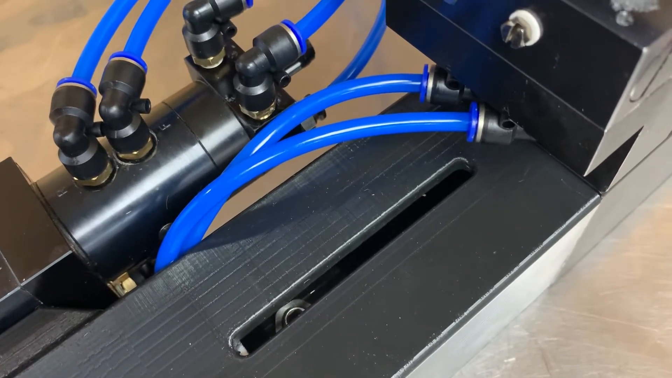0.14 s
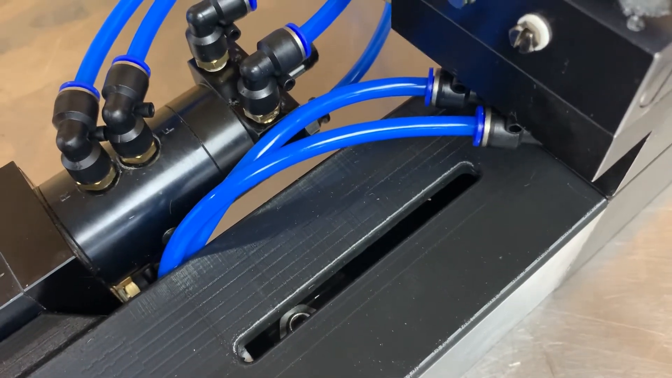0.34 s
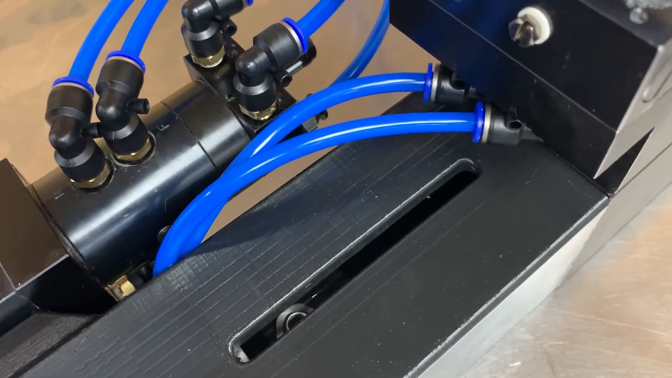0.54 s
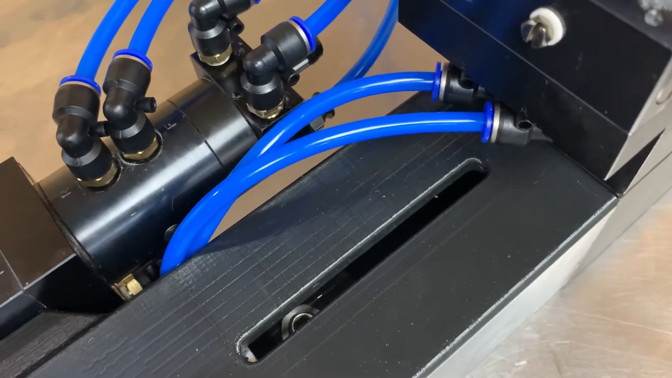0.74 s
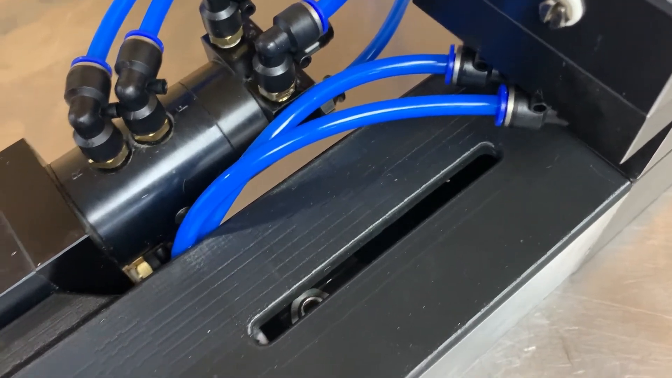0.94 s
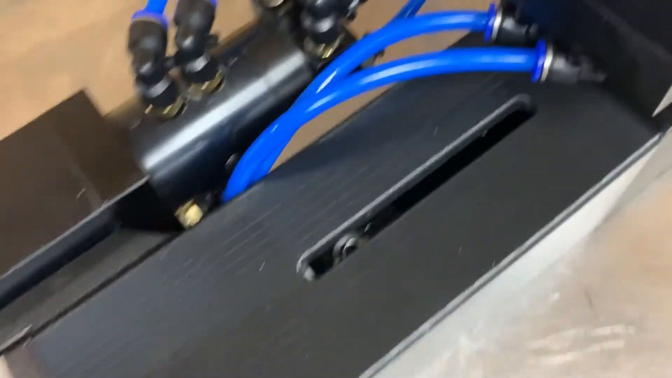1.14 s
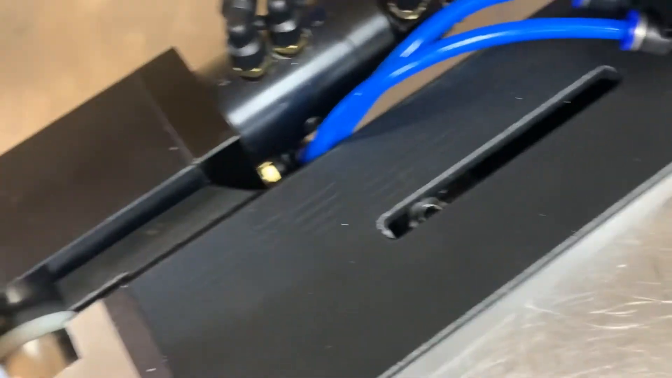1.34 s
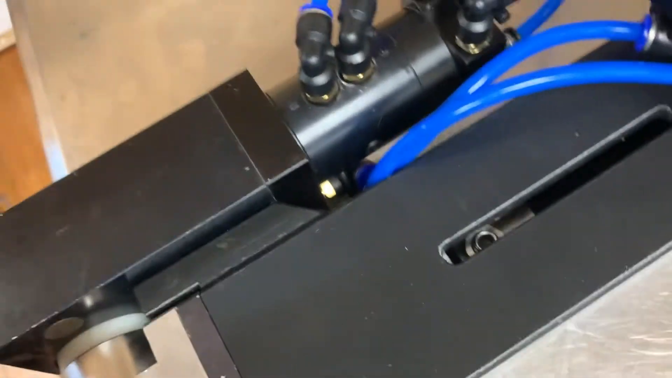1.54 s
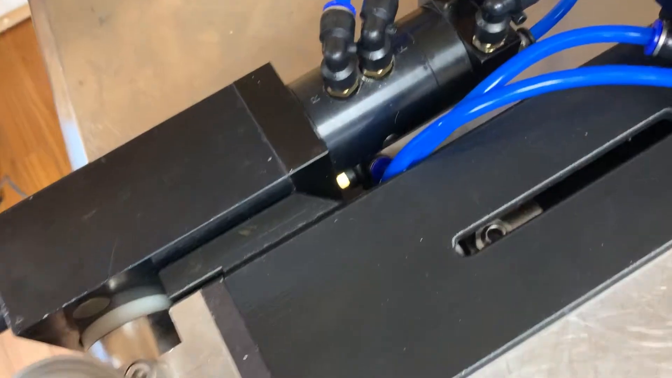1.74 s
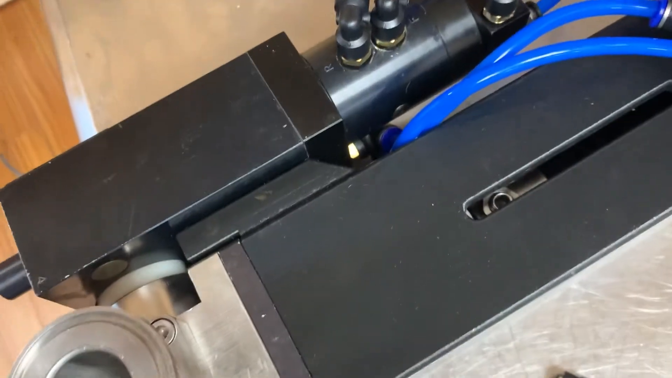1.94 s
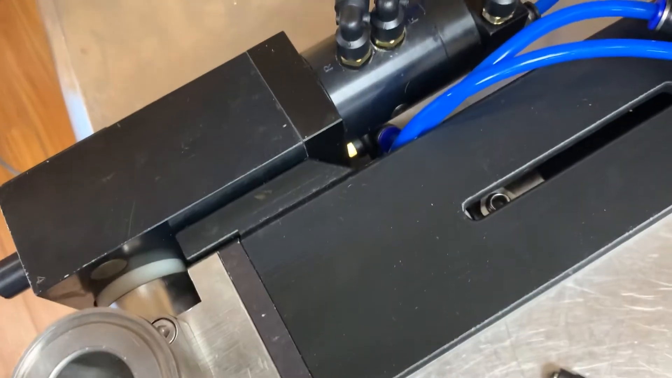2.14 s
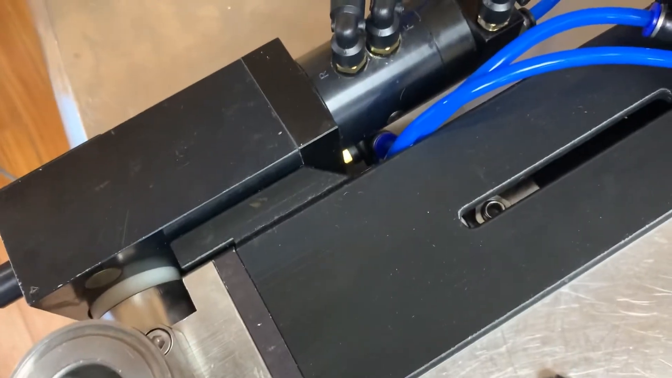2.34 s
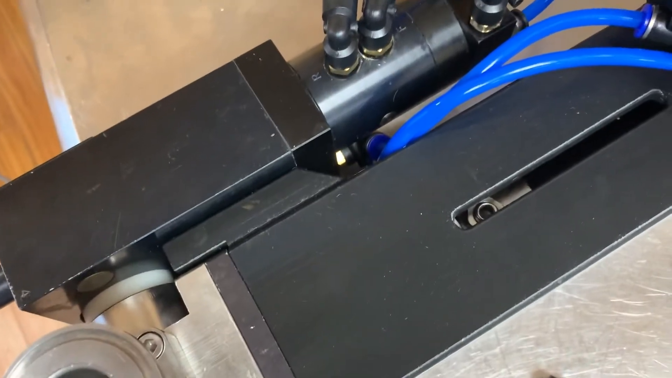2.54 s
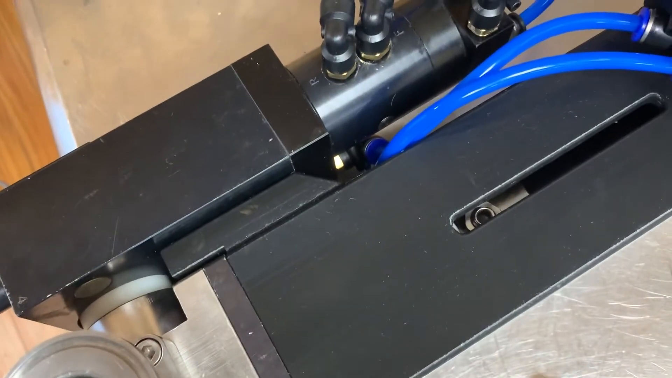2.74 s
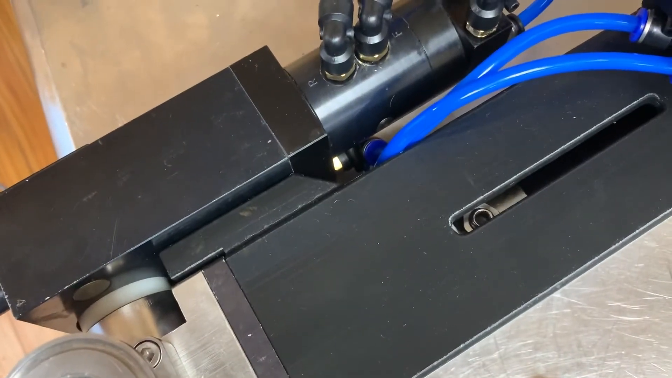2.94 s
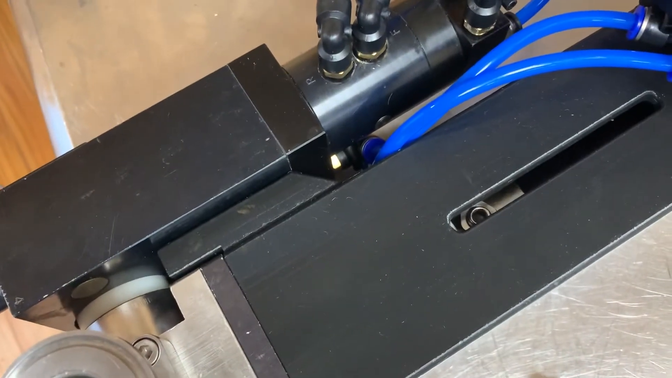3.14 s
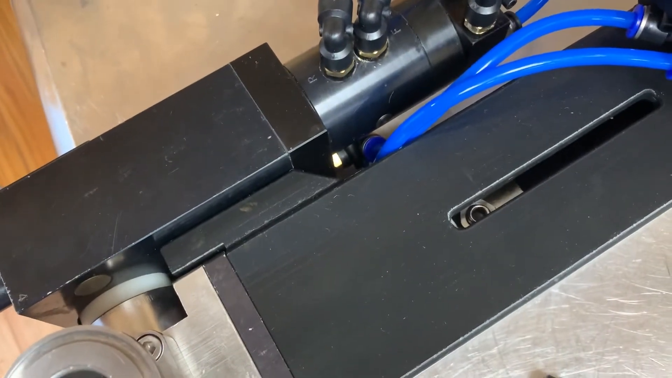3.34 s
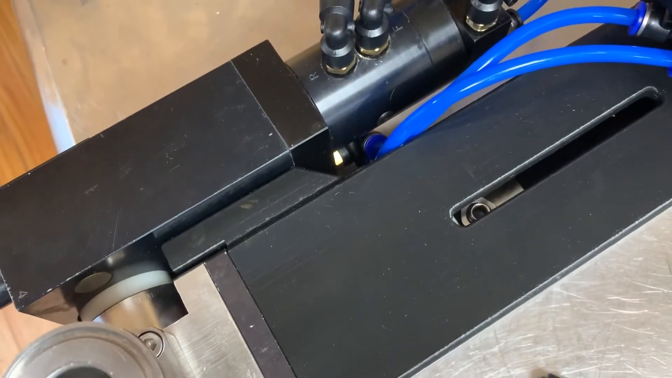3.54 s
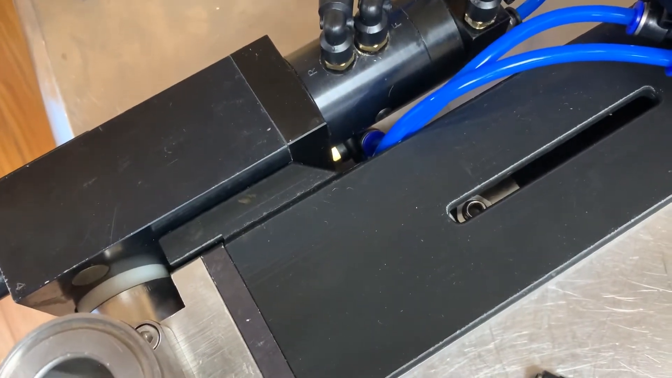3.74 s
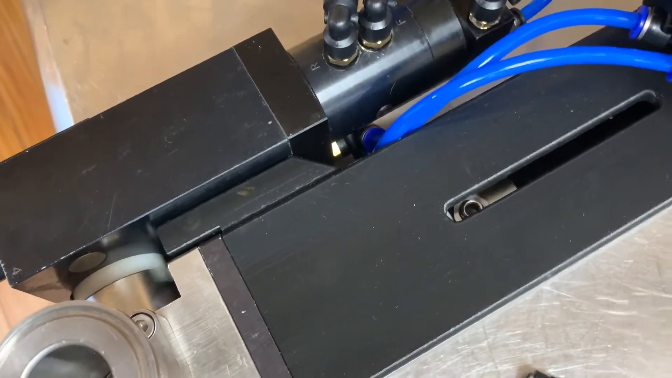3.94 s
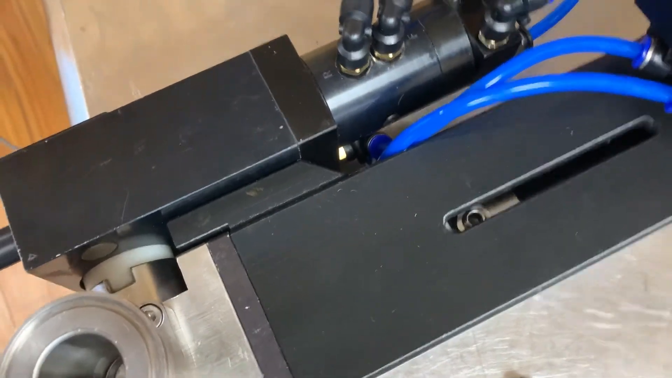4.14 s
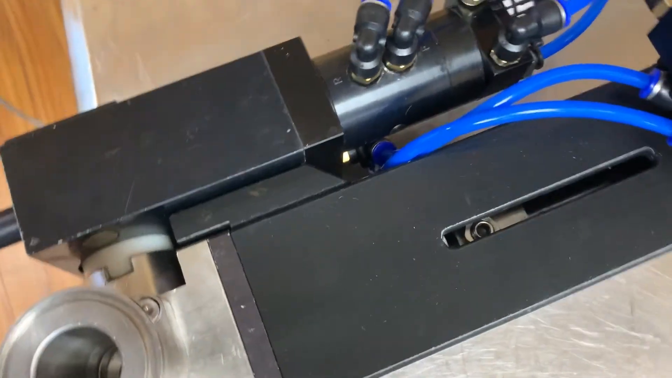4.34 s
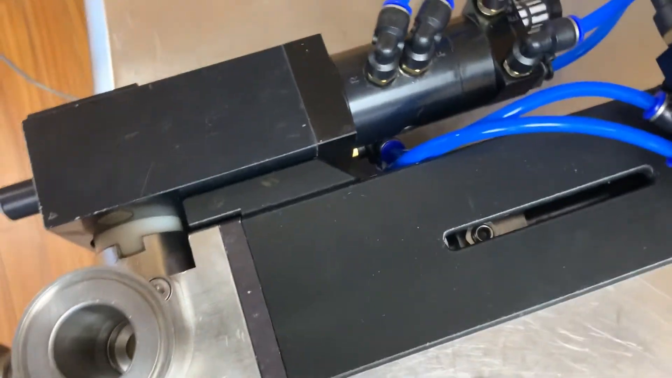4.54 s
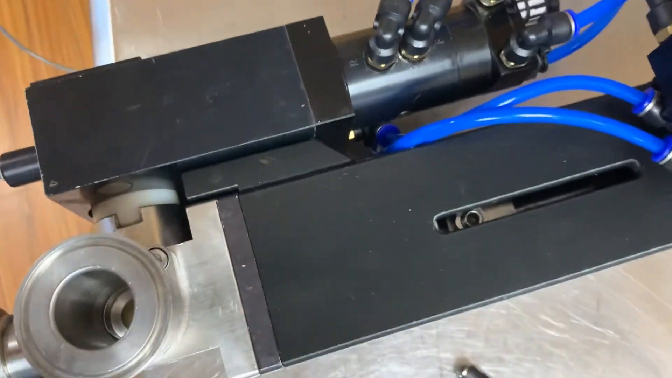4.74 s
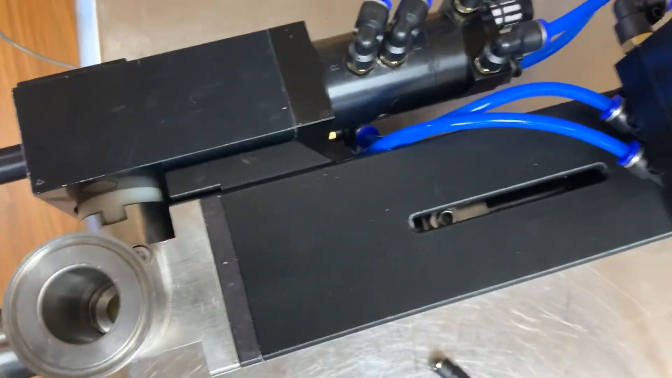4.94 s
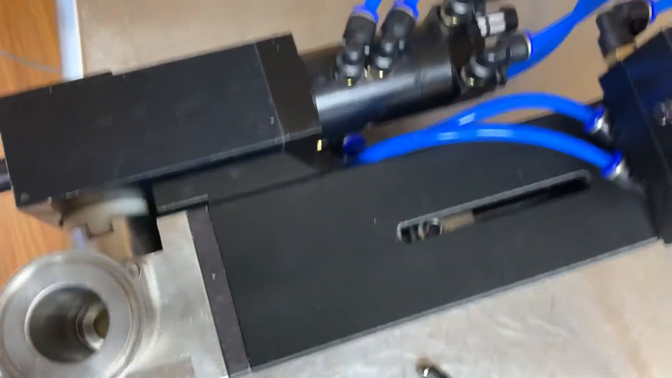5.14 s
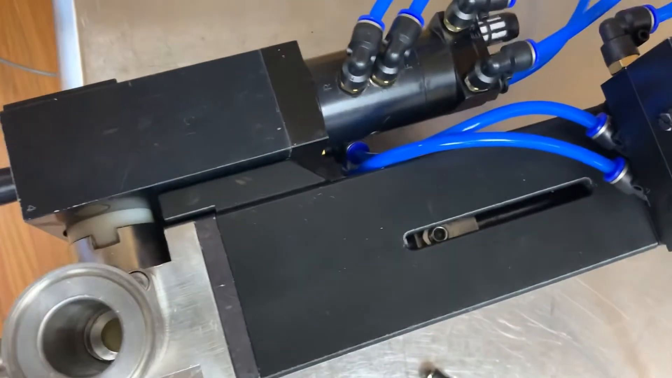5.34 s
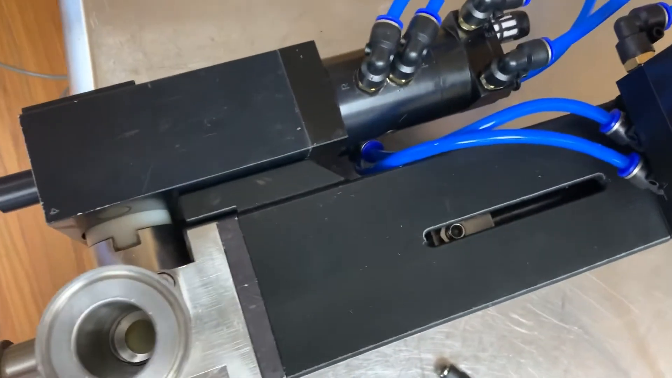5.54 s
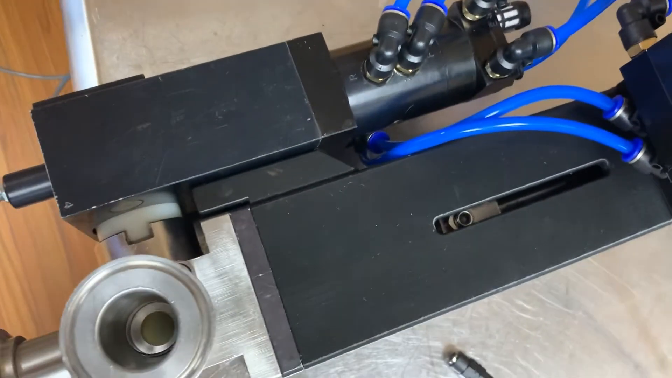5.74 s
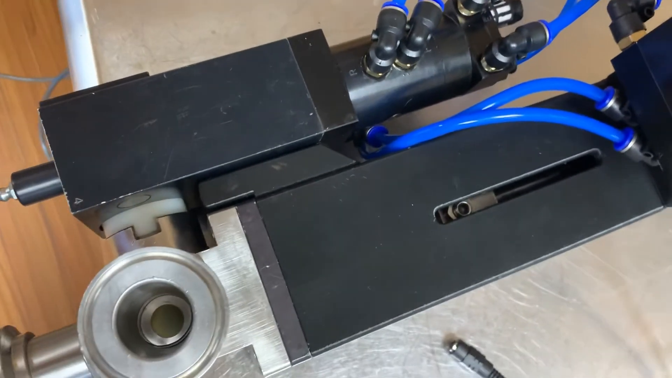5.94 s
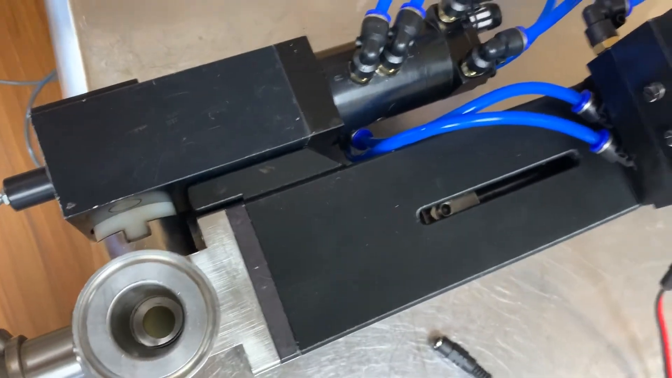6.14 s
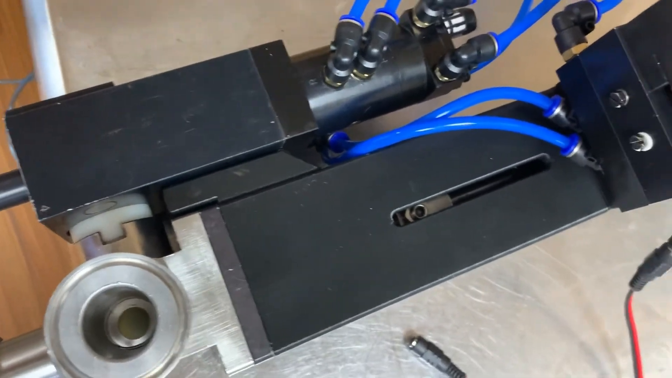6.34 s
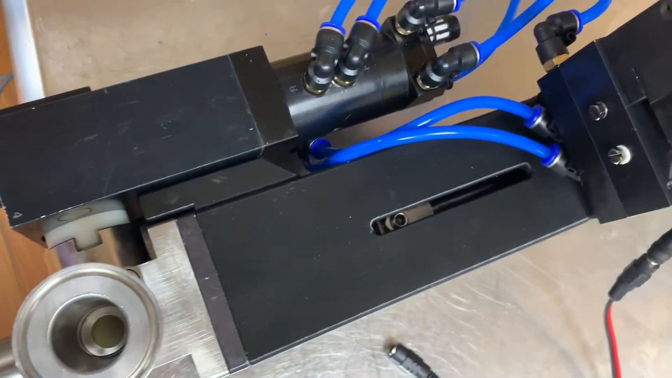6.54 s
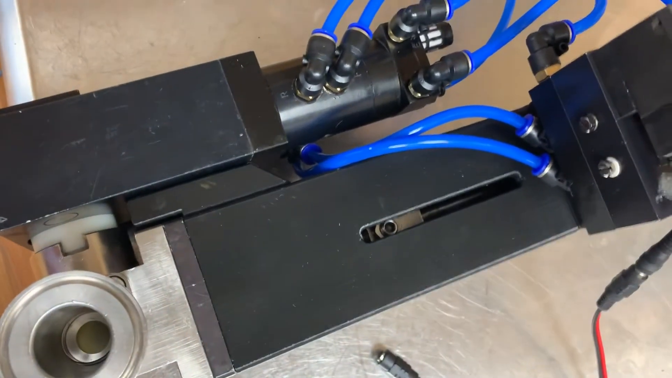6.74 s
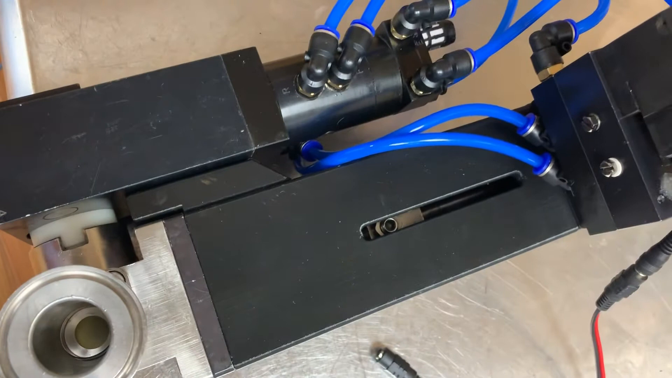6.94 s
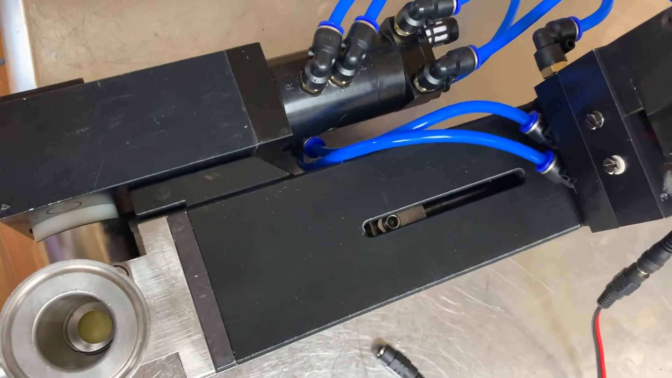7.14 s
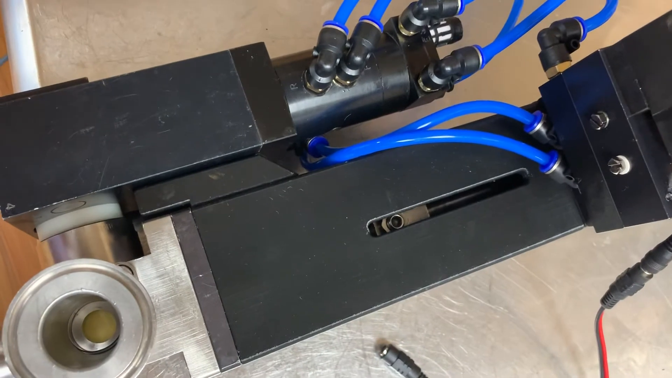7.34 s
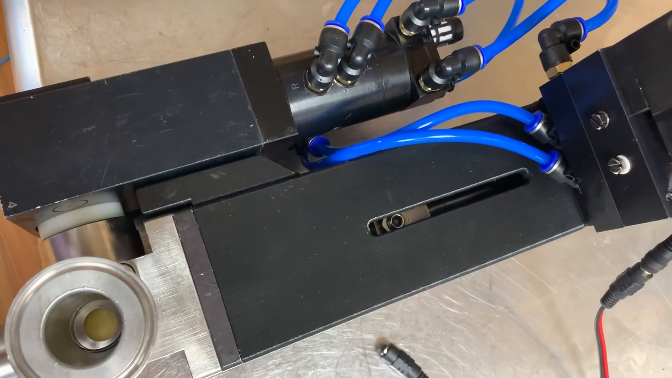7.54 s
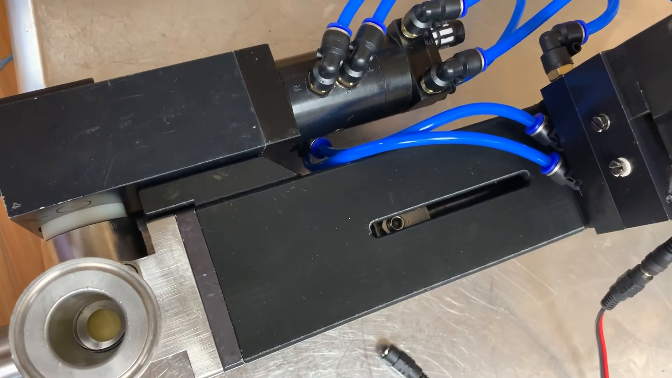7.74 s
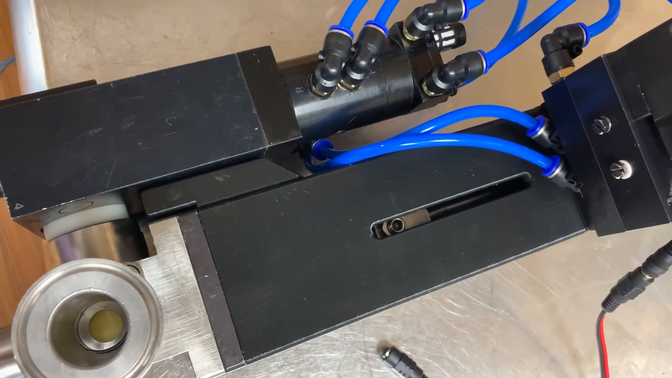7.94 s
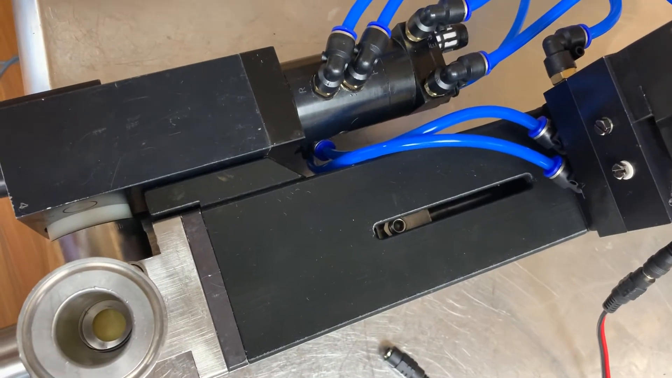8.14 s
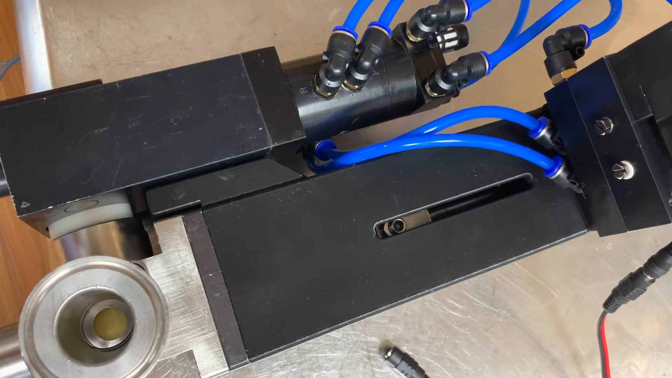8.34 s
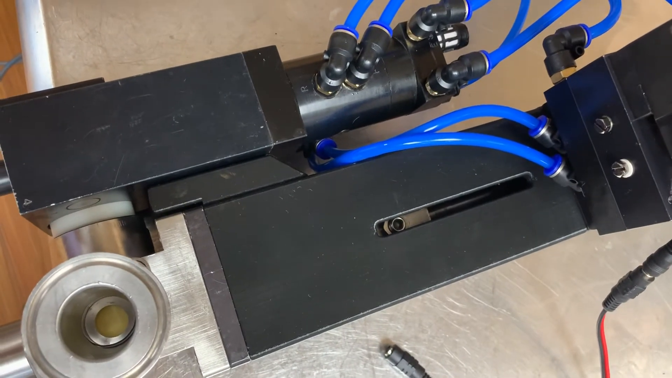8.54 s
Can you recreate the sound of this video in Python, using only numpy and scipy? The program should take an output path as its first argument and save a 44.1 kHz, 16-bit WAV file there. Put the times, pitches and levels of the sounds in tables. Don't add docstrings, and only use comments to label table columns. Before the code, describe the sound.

Close stereo view of a pneumatic cylinder in a humming factory hall. Air drains softly, then a double metallic clack with a burst of air starts a bright, steady hiss that dulls and shifts as the microphone draws back. Near four seconds another clack switches to a quieter, hollow hose breath, followed by a hard ringing knock. The airflow fades until a third clack at seven seconds brings back a softer hiss.

```python
import sys
import numpy as np
from scipy import signal
from scipy.fft import rfft, irfft
from scipy.io import wavfile
from scipy.ndimage import uniform_filter1d

SR = 44100
rng = np.random.default_rng(int(sys.argv[2]) if len(sys.argv) > 2 else 0)


def ratio_of_db(decibels):
    return 10 ** (np.asarray(decibels, float) / 20)


def bounce(signal):
    frames = np.transpose(np.atleast_2d(signal))
    limited = np.clip(frames, -1, 1)
    pcm = np.round(limited * 32767).astype(np.int16)
    wavfile.write(sys.argv[1], SR, pcm)


N = 383669
HZ = np.fft.rfftfreq(N, 1 / SR) + 1e-3
TOP_HZ = 15750

# (starts [s], ends [s])
MOVE_S = (.98, 1.65)
# (frequency [Hz], level [dB per Hz])
JET_COLOURS = [
    [(880, -46), (1500, -14.5), (1690, -29), (1990, -20.5), (2420, -15.5), (2890, -22), (3770, -14),
     (4240, -3.5), (4810, -12), (5700, -8.5), (6300, -7), (6800, -9), (7400, -6.5), (8300, -0.5),
     (9300, 0.5), (9900, -5), (10700, -3), (11150, -1), (11550, 4), (12800, 0), (13600, -8), (14600, -2.5),
     (15450, 0), (16500, -10.5)],
    [(880, -79), (1500, -18), (1970, -20.5), (2290, -14.5), (2920, -18.5), (3730, -6), (4860, -16),
     (5860, -5), (6850, -7), (7340, -3), (9280, -3), (10000, 2), (10950, -4.5), (11400, 2.5), (11800, -5),
     (12700, 2), (13400, -4.5), (13900, -1), (14700, -11), (15300, -6), (15600, -6)],
    [(880, -58), (1500, -21.5), (2400, -17), (2900, -13.5), (3380, -13), (3880, -16.5), (4450, -6.5),
     (5260, -14), (6650, -5.5), (7340, -4.5), (8010, 1), (8840, -6), (11000, -0.5), (12100, -3.5),
     (14400, -4.5), (15600, -7)],
]
# (frequency [Hz], left minus right [dB])
PORT_BALANCE = [(70, -.2), (150, 1.2), (1000, 1.3), (2000, 2.5), (2750, -.5), (3800, 3), (5200, 4),
                (6500, .5), (7600, -1.5), (8500, .3), (10500, 0)]
# (frequency [Hz], likeness [0-1])
NEAR_LIKENESS = [(60, .995), (300, .985), (700, .9), (1500, .6), (4500, .5), (7000, .55), (8000, .8),
                 (9800, .8), (11300, .96)]
# (frequency [Hz], likeness [0-1])
FAR_LIKENESS = [(90, .975), (300, .87), (700, .6), (1200, .65), (1900, .3), (3300, .62), (4700, .35),
                (6000, .6), (8000, .78), (9800, .78), (11300, .98)]
# (frequency [Hz], left leads by [rad])
VALVE_PHASE = [(0, 0), (700, -.6), (1250, -1.2), (1600, -3.1), (2400, -6.3), (3100, -9.4), (4300, -12.5),
               (5400, -15.2), (6300, -18.8), (7100, -20.4), (9000, -19.9), (10200, -19.4),
               (11300, -6 * np.pi)]


def at_hz(points):
    hz, value = np.transpose(points)
    return np.interp(np.log(HZ), np.log(np.maximum(hz, 1)), value)


def in_time(rows):
    s, *columns = np.transpose(rows)
    t = np.arange(N) / SR
    return [ratio_of_db(np.interp(t, s, column, -200, -200)) for column in columns]


def drift(rate_hz):
    points = rng.standard_normal(int(N / SR * 60))
    slow = signal.filtfilt(*signal.butter(1, min(rate_hz, 25) / 30), points)
    return np.interp(np.linspace(0, len(slow) - 1, N), np.arange(len(slow)), slow / slow.std())


def ports(direct, scattered, likeness, phase_table, balance):
    alike = at_hz(likeness)
    phase = np.interp(HZ, *np.transpose(phase_table))
    sign = np.array([[1], [-1]])
    pair = np.sqrt((1 + alike) / 2) * direct + sign * np.sqrt((1 - alike) / 2) * scattered
    return irfft(pair * np.exp(.5j * sign * phase) * ratio_of_db(sign * at_hz(balance) / 2), N)


def air(gain, likeness, phase_table=VALVE_PHASE, top_hz=TOP_HZ, balance=PORT_BALANCE):
    direct, scattered = gain * (HZ < top_hz) * rfft(rng.standard_normal((2, N)))
    x = ports(direct, scattered, likeness, phase_table, balance)
    return x / np.sqrt(np.mean(x.mean(axis=0) ** 2))


def echoed(colour, stretch):
    # (delay [s], level [dB])
    bench_echoes = [(.00047, -32), (.00057, -16.5), (.0019, -17), (.0032, -21), (.0047, -20), (.0071, -22)]
    ripple = 1 + sum(ratio_of_db(db) * np.exp(-2j * np.pi * HZ * s * stretch) for s, db in bench_echoes)
    return ratio_of_db(at_hz(colour)) * np.abs(ripple)


def hose(waves):
    power = sum(ratio_of_db(2 * db) / (1 + (2 * (HZ - hz) / width) ** 2) ** 1.25 for hz, width, db in waves)
    return air(np.sqrt(power), NEAR_LIKENESS) * ratio_of_db(.7 * drift(rate_hz=3.0))


def ring(clicks, hz, t60):
    r = ratio_of_db(-60 / (t60 * SR))
    w = 2 * np.pi * hz / SR
    return signal.lfilter([0, np.sin(w)], [1, -2 * r * np.cos(w), r * r], clicks + 1e-18)


def strike(times, strengths_db, modes, chatter_s, late_cycles, soft=False):
    t = np.arange(400) / SR
    chatter = rng.standard_normal((len(times), 400)) ** 3 * np.exp(-t / chatter_s)
    chatter /= np.sqrt(np.sum(chatter ** 2, axis=1, keepdims=True))
    if soft:
        chatter = np.exp(-t / chatter_s) / (chatter_s * SR) + 0 * chatter
    at = (np.array(times) * SR).astype(int)[:, None] + np.arange(400)
    out = np.zeros(N)
    for k, ((hz, level_db, t60), db) in enumerate(zip(modes, strengths_db.T)):
        clicks = np.zeros(N)
        np.add.at(clicks, at + int(late_cycles * SR / hz), chatter * ratio_of_db(db + level_db)[:, None])
        out += (-1) ** k * ring(clicks, hz, t60)
    return out


def hall():
    # (frequency [Hz], level [dB per Hz])
    colour = [(12, -46), (20, -41), (38, -7), (54, -14), (87, 1), (135, -9), (153, -12), (232, -11),
              (312, -23.5), (436, -24), (464, -28), (801, -27.5), (1970, -29.5), (2280, -38), (3000, -44),
              (3900, -61), (6600, -120)]
    # (frequency [Hz], left-right likeness [0-1])
    likeness = [(30, .96), (90, .95), (250, .72), (500, .4), (900, .3), (1900, .3), (3300, .5)]
    # (frequency [Hz], left minus right [dB])
    balance = [(70, 0), (130, .8), (250, 3.8), (450, -1.5), (1000, -.5), (2000, 1.5)]
    near = 1 - np.interp(np.arange(N) / SR, MOVE_S, (0, 1))
    level = ratio_of_db(-49.5 + 2 * near + 1.2 * drift(rate_hz=6.2))
    return level * air(ratio_of_db(at_hz(colour)), likeness, balance=balance)


def frame():
    # (time [s], level [dB])
    frame_thuds = [
        (0.565, -45),
        (4.348, -32),
        (7.547, -48),
    ]
    t = np.arange(N) / SR
    dying = sum(ratio_of_db(db - 60 * np.maximum(t - s, 0) / 0.21) * np.clip((t - s) / 0.0018, 0, 1)
                for s, db in frame_thuds)
    return dying * air(1 / (1 + (400 / HZ) ** 4 + (HZ / 1400) ** 4), NEAR_LIKENESS)


def return_stroke():
    # (starts [s], ends [s], level [dB])
    returns = [
        (-1.57, .176, -41),
        (4.0, 7.03, -47),
    ]
    # (frequency [Hz], width [Hz], level [dB])
    wide_hose = [(222, 21.5, -0.5), (395, 113, -7.5), (517, 33, -2.5), (630, 41, -1.5), (764, 112, -2),
                 (904, 42, -3.5), (985, 22, 0.5), (1054, 51, -2)]
    narrow_hose = [(1552, 33, 2.5), (1695, 90, 5), (1974, 48, 3), (2124, 41, 0.5), (2400, 110, -1.5),
                   (2630, 92, -3.5), (2844, 64, -3.5), (3125, 114, 2.5), (3520, 310, -2), (3850, 125, 4),
                   (4050, 31, -9), (4085, 59, 4.5), (4380, 32, 2.5), (4660, 63, -6), (6500, 93, -10),
                   (6840, 90, -1.5), (7100, 64, -10), (7400, 150, -15)]
    # (frequency [Hz], width [Hz], level [dB])
    fitting = [(1250, 90, 2), (1490, 120, 2), (1960, 60, 0), (2700, 150, -3), (6410, 160, 0),
               (6610, 80, -5)]
    # (frequency [Hz], level [dB per Hz])
    leak_colour = [(2650, -29), (4500, -1), (4790, -5), (5400, 3.5), (6080, -2), (6610, -5), (7970, 4),
                   (9620, 1), (10600, 4), (12800, -14), (13900, -15), (14900, -2), (15600, -7)]
    far_hiss = [(1470, -42), (2500, -25), (3050, -3), (3610, -1), (3930, -18), (4240, -10), (5670, -3),
                (6030, -7), (9200, -2), (9930, -1.5), (10800, -6), (14100, -3.5), (15600, -3)]
    layer_db = [0, -3.5, -1.5, -1.64]
    follows = [0.98, 1.11, 1.56, 0.74]
    layer_fill_db = [0, 0, -4, -0.5]
    fill_s, steady_s, drain_db, drain_s = 0.4, 0.46, -18, 1.85

    t = np.arange(N) / SR
    wide, lower, upper = hose(wide_hose), hose(narrow_hose[:8]), hose(narrow_hose[8:])
    leak = air(echoed(leak_colour, 1.4), FAR_LIKENESS)
    drag_s, drag_hold_s, drag_edge_s = 4.83, 0.12, 0.058
    off = np.maximum(drag_s - t, t - drag_s - drag_hold_s).clip(0) / drag_edge_s
    out = ratio_of_db(-50 - 22 * off) * hose([(330, 120, -3), (523, 220, 1)])
    out = out + ratio_of_db(-53) * air(echoed(far_hiss, 1.3), FAR_LIKENESS)
    for starts, ends, db in returns:
        age = t - starts
        on = (t >= starts) * (t < ends)
        filling = np.clip(1 - age / fill_s, 0, 1)
        flow_db = drain_db * (1 - np.exp(-np.maximum(age - steady_s, 0) / drain_s))
        wide_gain, lower_gain, upper_gain, leak_gain = (
            on * ratio_of_db(db + own_db + fill_db * filling + share * flow_db)
            for own_db, share, fill_db in zip(layer_db, follows, layer_fill_db))
        shade = ratio_of_db(-2 * (starts < 0))
        spit = on * ratio_of_db(db + 15 - 295 * np.abs(age))
        out = out + wide_gain * wide + lower_gain * lower + upper_gain * upper * shade
        out = out + (leak_gain + spit) * leak
    return out + (t < returns[0][1]) * ratio_of_db(-54) * hose(fitting)


def sliding_colour(s, hz):
    # (near [Hz], aside [Hz], arrives [s])
    landmarks = [(2900, 2960, 1.4), (4240, 3700, 1.7), (6300, 5400, 1.35), (7700, 4600, 1.3),
                 (8900, 7900, 1.5), (9900, 8600, 1.55), (11550, 10000, 1.2), (13600, 10950, 1.73),
                 (15100, 12500, 2.1), (17500, 14700, 2.0), (19000, 18000, 2.0)]
    levels_db = []
    for k in (0, 1):
        gain = echoed(JET_COLOURS[k], 1 + .17 * k)
        levels_db.append(20 * np.log10(gain / np.sqrt(np.mean(gain[HZ < TOP_HZ] ** 2)) + 1e-9))
    near_db, aside_db = levels_db
    near_hz, aside_hz, arrives = np.transpose(landmarks)
    out = np.zeros((len(hz), len(s)))
    for k, now in enumerate(s):
        moved = np.clip((now - MOVE_S[0]) / (arrives - MOVE_S[0]), 0, 1) ** 0.71
        place = np.r_[0, near_hz + moved * (aside_hz - near_hz)]
        share = np.interp(hz, place[1:], moved) ** 1.1
        from_near = np.interp(np.interp(hz, place, np.r_[0, near_hz]), HZ, near_db)
        from_aside = np.interp(np.interp(hz, place, np.r_[0, aside_hz]), HZ, aside_db)
        out[:, k] = ratio_of_db((1 - share) * from_near + share * from_aside)
    return out


def jet():
    # (vent opens [s], full flow [s], ends [s], first level [dB], full level [dB])
    forwards = [
        (.3, 0.478, 3.9, -50.5, -35.5),
        (7.195, 7.694, 8.7, -47.5, -42),
    ]
    # (frequency [Hz], left leads by [rad])
    vent_phases = [
        [(0, 0), (700, -.7), (1500, -3.1), (2400, -6.3), (3000, -9.4), (3450, -6.3), (4500, -6.8), (5000, -8.2),
         (6500, -9.5), (7000, -9.2), (8000, -7.8), (10200, -6.9), (11300, -2 * np.pi)],
        [(0, 0), (700, -.7), (1500, -3.1), (2400, -6.3), (3000, -9.4), (3900, -7.5), (4600, -7), (4900, -4.3),
         (6000, -6.3), (7000, -8.4), (9000, -7.3), (10200, -6.9), (11300, -2 * np.pi)],
        [(0, 0), (700, -.7), (1500, -3.1), (2300, -5.5), (2750, -9.2), (3600, -6.3), (4300, -4.5), (4800, -3.2),
         (5400, -3.4), (6200, -6.3), (7300, -8.2), (9000, -7.3), (11300, -2 * np.pi)],
    ]
    t = np.arange(N) / SR
    level, later = (in_time([(opens, first_db), (full, db), (ends, db)])[0]
                    for opens, full, ends, first_db, db in forwards)
    level = level * ratio_of_db(-4 * (1 - np.exp(-np.maximum(t - MOVE_S[0], 0) / 0.42)))
    near, aside = (air(1, FAR_LIKENESS, vent_phases[k]) for k in (0, 1))
    above = air(echoed(JET_COLOURS[2], 1.34), FAR_LIKENESS, vent_phases[2])
    turn = np.interp(t, MOVE_S, (0, np.pi / 2))
    moving = np.cos(turn) * near + np.sin(turn) * aside
    span = 4 * SR
    hz, s, frames = signal.stft(moving[:, :span], SR, nperseg=1024)
    first = np.zeros((2, N))
    first[:, :span] = signal.istft(frames * sliding_colour(s, hz), SR, nperseg=1024)[1][:, :span]
    return ratio_of_db(0.54 * drift(rate_hz=4.8)) * (level * first + later * above)


def valve_flow(opens, full, seats, rush_db, puff_db):
    rush_sag, rumble_sag = 60, 114
    rush_bleed, rumble_bleed, bleed_s = 430, 215, 0.21
    swell = max(seats - .01, full + 0.0008)
    shut = seats + 0.009
    low_db = rush_db - 6
    end_db = rush_db - rush_sag * (seats - full)
    shut_db, puff_shut_db = end_db - 12.5, puff_db - 15
    return [(opens - 0.017, rush_db - 30, low_db - 30),
            (opens, rush_db - 10.5, low_db - 10.5),
            (full, rush_db, low_db),
            (swell, rush_db - rush_sag * (swell - full), low_db - rumble_sag * (swell - full)),
            (seats, end_db, puff_db),
            (shut, shut_db, puff_shut_db),
            (shut + bleed_s, shut_db - rush_bleed * bleed_s, puff_shut_db - rumble_bleed * bleed_s)]


def rushes():
    # (spool opens [s], fully open [s], seats [s], rush [dB], seating puff [dB])
    reversals = [
        (0.181, 0.191, 0.28, -22, -22),
        (3.907, 3.915, 3.98, -19, -19),
        (7.031, 7.036, 7.115, -20, -20),
        (7.136, 7.14, 7.155, -29.5, -30),
    ]
    rush_spots = [0, 1, 2, 2]
    # (frequency [Hz], level [dB per Hz])
    rush_colours = [
        [(760, -28), (1300, -18), (1530, -5), (1630, -15), (1970, -4.5), (2300, -13), (2770, -4), (3740, -9.5),
         (4280, -14), (4950, -15), (6980, -8.5), (7580, -10), (10600, -14.5), (15500, -21)],
        [(760, -57), (1300, -35), (1630, 1.5), (1810, -8), (1890, -6), (2250, -6.5), (2520, -17), (2600, -1.5),
         (3340, -1), (3670, -4.5), (6420, -12), (7820, -1.5), (8670, -9.5), (15500, -16.5)],
        [(760, -14), (1300, -4.5), (1370, -19), (1680, -9), (1860, 0), (1990, 1), (2350, -5.5), (3110, 1),
         (3590, -4.5), (3900, -8.5), (6160, -6), (8580, -1), (9330, -7.5), (15500, -18)],
    ]
    # (frequency [Hz], level [dB per Hz])
    rumble_colour = [(35, -30), (60, -1), (107, 0), (165, -5.5), (234, -5), (350, -7.5), (532, -5.5),
                     (775, -6.5), (1370, -9), (1500, -14), (1950, -58.5), (3300, -120)]
    rumble = air(ratio_of_db(at_hz(rumble_colour)), NEAR_LIKENESS)
    flutter = ratio_of_db(0.9 * uniform_filter1d(rng.standard_normal(N), size=60) * np.sqrt(60))
    rush = [flutter * air(ratio_of_db(at_hz(colour)), NEAR_LIKENESS) for colour in rush_colours]
    out = 0
    for row, spot in zip(reversals, rush_spots):
        rush_gain, rumble_gain = in_time(valve_flow(*row))
        out = out + rush_gain * rush[spot] + rumble_gain * rumble
    return out


def knocks():
    # (time [s], peak [dB], low modes [dB], high modes [dB])
    blows = [
        (0.5632, -39.5, 7, 11),
        (0.572, -47, 11, 8),
        (4.3466, -12, -16, 1),
        (4.352, -21, 9.5, -15),
        (4.3622, -30, 9.5, -2),
        (7.5456, -39.5, -8, 9.5),
        (7.5556, -41.5, -1, 8),
        (7.565, -48, 11, -4),
        (7.585, -59, 24, -4),
        (7.601, -59, 26, -4),
    ]
    # (frequency [Hz], level [dB], t60 [s])
    cylinder_modes = [(206, -17.5, 0.037), (411, -19.5, 0.039), (503, -20.5, 0.082), (636, -24, 0.031),
                      (807, -16.5, 0.1), (960, -5.5, 0.0084), (1095, 0, 0.035), (1246, -10, 0.034),
                      (1470, -8, 0.018), (1720, -13, 0.031), (2120, -9, 0.014), (2420, -12.5, 0.02),
                      (2580, -10, 0.016), (2980, -17, 0.01)]
    housing_modes = [(1210, 2.5, 0.11), (1236, -2, .12)]
    # (time [s], level [dB])
    seat_ring = [
        (0.268, -26),
        (0.305, -35.5),
        (3.984, -28),
        (7.035, -31),
        (7.1115, -22.5),
        (7.135, -32),
        (7.55, -43.5),
    ]
    s, peak_db, low_db, high_db = np.transpose(blows)
    hz = np.array(cylinder_modes)[:, 0]
    tilt_db = np.outer(low_db, hz < 700) + np.outer(high_db, hz > 1600)
    strengths_db = peak_db[:, None] + tilt_db + rng.normal(0, 1.8, tilt_db.shape)
    cylinder = strike(s, strengths_db, cylinder_modes, chatter_s=.00006, late_cycles=1.365, soft=True)
    s, seat_db = np.transpose(seat_ring)
    return cylinder + strike(s, seat_db[:, None], housing_modes, chatter_s=.00006, late_cycles=0.92, soft=True)


def thumps():
    # (time [s], peak [dB], start [Hz], end [Hz], dies in [s])
    bounces = [(.177, -20, 800, 690, .006), (.1831, -22, 700, 500, .006), (.1924, -11, 450, 165, .013),
               (.2637, -11.5, 850, 270, .013), (.271, -19, 500, 200, .015), (.2815, -23, 80, 72, .045),
               (3.9107, -17, 900, 700, .005), (3.9116, -15, 600, 190, .016),
               (3.977, -6.5, 1050, 230, .0105), (3.9835, -15, 300, 160, .013), (3.992, -23, 80, 72, .045),
               (4.398, -34, 700, 240, .03), (7.0319, -18, 900, 550, .006), (7.0341, -12, 560, 190, .014),
               (7.042, -27, 200, 145, .05), (7.1059, -10.5, 980, 230, .011), (7.1135, -18, 300, 130, .016),
               (7.12, -23, 82, 75, .045), (7.1444, -20, 500, 240, .011), (7.607, -42, 250, 130, .04)]
    out = np.zeros(N)
    t = np.arange(5000) / SR
    for s, db, start_hz, end_hz, dies in bounces:
        hz = end_hz + (start_hz - end_hz) * np.exp(-t / .0015)
        swell = (1 - np.exp(-t / .0004)) * ratio_of_db(db - 8 * t / dies - 60 * (t / dies) ** 3)
        out[int(s * SR):][:5000] -= swell * np.sin(2 * np.pi * np.cumsum(hz) / SR)
    return signal.sosfilt(signal.butter(2, 30, "high", fs=SR, output="sos"), out)


def clacks():
    # (time [s], low metal [dB], high metal [dB], crack [dB], crack centre [Hz])
    contacts = [(0.1753, -28, -38, -21.5, 13000), (0.1845, -13, -14.5, -11, 5000),
                (.187, -28, -30, -16, 2400), (0.1894, -10.5, -13.5, -15, 7950),
                (0.1943, -14, -26, -10, 3500), (0.269, -29, -33, -18.5, 10000),
                (0.2704, -21.5, -32, -14, 9100), (0.28, -23, -36, -10.5, 4240),
                (3.9088, -9, -11.5, -10, 6040), (3.9123, -22, -15, -20, 8500),
                (3.9162, -19, -20, -22, 5000), (3.9837, -16.5, -28, -8.5, 4600),
                (3.985, -27, -24, -15, 10000), (7.0254, -21, -20, -14, 7000),
                (7.0298, -12.5, -35, -19, 2300), (7.0313, -15, -11, -8.5, 9200),
                (7.0351, -13.5, -18, -19, 4000), (7.1112, -16.5, -19, -14, 7550),
                (7.1127, -15, -20, -20, 6500), (7.1417, -30, -38, -14.5, 4270),
                (7.142, -40, -42, -19, 13000)]
    # (frequency [Hz], level [dB], t60 [s])
    body = [(1730, -14, 0.02), (2080, -3.5, 0.02), (2300, -6.5, 0.019), (3020, -1.5, 0.018),
            (3940, -15, 0.012), (4300, -6.5, 0.0049), (5000, -18, 0.016), (6070, -2, 0.0083),
            (6660, -22, 0.0099), (7900, -5, 0.014), (8500, -4.5, 0.0088), (9950, 1.5, 0.0084),
            (11500, -21, .008)]
    s, low_db, high_db, crack_db, crack_hz = np.transpose(contacts)
    low = np.array(body)[:, 0] < 4800
    strengths_db = np.where(low, low_db[:, None] + 1.0, high_db[:, None] + 2.0)
    strengths_db = strengths_db + rng.normal(0, 2.6, (len(s), len(body)))
    out = strike(s, strengths_db, body, chatter_s=0.0021, late_cycles=0.94)
    t = np.arange(600) / SR
    burst = (1 - np.exp(-t / 0.00023)) * np.exp(-t / 0.0013) * rng.standard_normal((len(s), 600))
    for at, db, hz, noise in zip(s, crack_db, crack_hz, burst):
        band = signal.butter(1, [hz / 1.52, min(hz * 1.14, 15000)], "band", fs=SR)
        out[int(at * SR):][:600] += ratio_of_db(db + 11) * signal.lfilter(*band, noise)
    return out


def close_hits(x):
    # (frequency [Hz], left minus right [dB])
    valve_balance = [(70, -.5), (150, 0), (300, 1.5), (1000, .5), (1700, 3), (2400, 2.5), (3400, 3.5),
                     (4800, 5), (6500, 1.5), (8500, .8), (10500, 0)]
    room_t60_s, room_db = 0.34, -21.5
    t = np.arange(N) / SR
    nearby = rng.standard_normal(N) * np.exp(-t / .0012)
    tail = signal.lfilter([.15], [1, -.85], rng.standard_normal((2, N)))
    tail = tail * ratio_of_db(-60 * t / room_t60_s) * (t > .008)
    blow = rfft(x) / (1 + (HZ / 16000) ** 40)
    scattered = rfft(nearby / np.linalg.norm(nearby)) / (1 + (1800 / HZ) ** 4)
    direct = ports(blow, blow * scattered, NEAR_LIKENESS, VALVE_PHASE, valve_balance)
    return direct + ratio_of_db(room_db) * irfft(blow * rfft(tail / np.linalg.norm(tail[0])), N)


def scene():
    background = hall() + frame()
    strokes = return_stroke() + jet()
    blows = close_hits(knocks() + thumps() + clacks())
    return background + strokes + rushes() + blows


def top_cut(x):
    return signal.sosfilt(signal.butter(12, 16830, fs=SR, output="sos"), x)


def record(dry):
    top = signal.cheby2(20, 45, 16750, fs=SR, output="sos")
    mix = signal.sosfiltfilt(top, np.clip(dry, -.9, .9))
    return top_cut(mix)


dry = scene()
out = record(dry)
bounce(out)
```